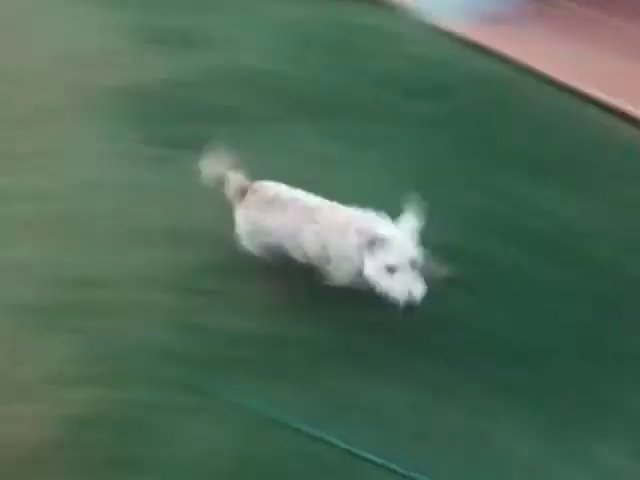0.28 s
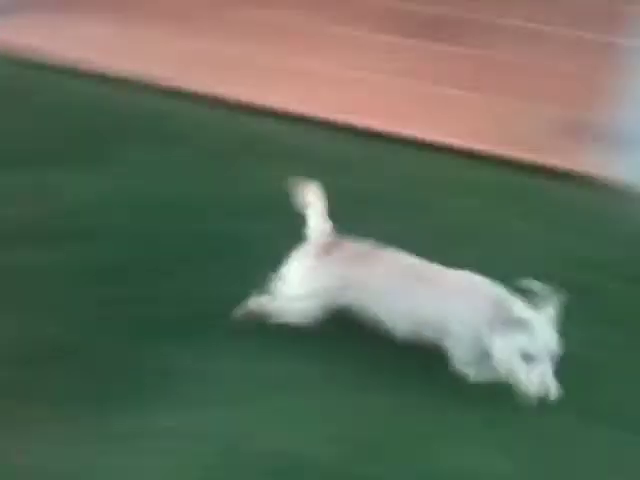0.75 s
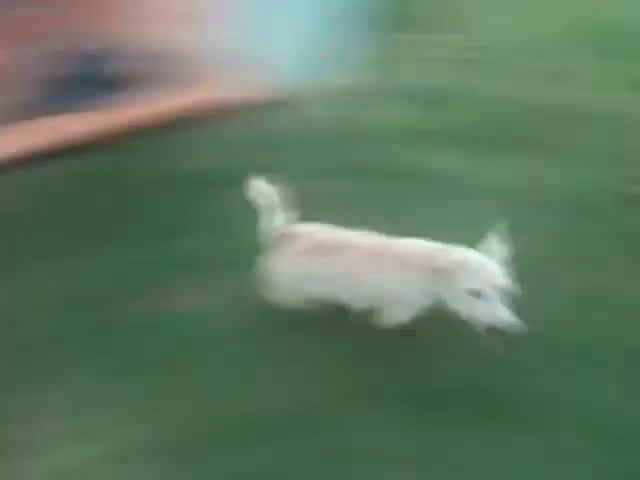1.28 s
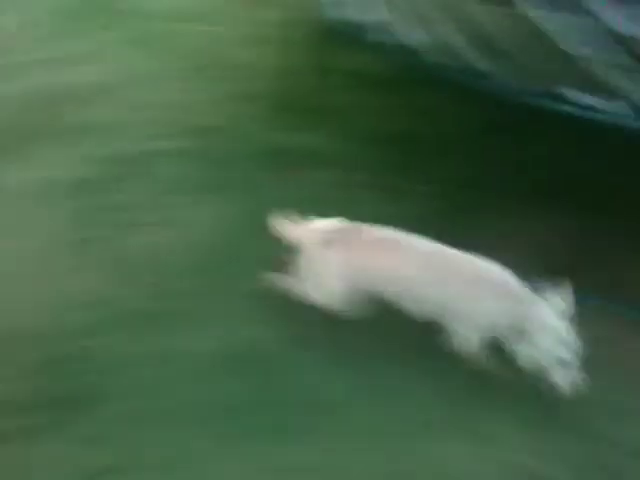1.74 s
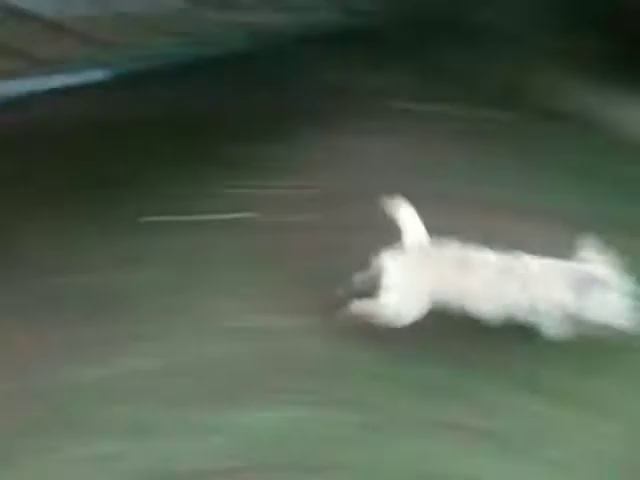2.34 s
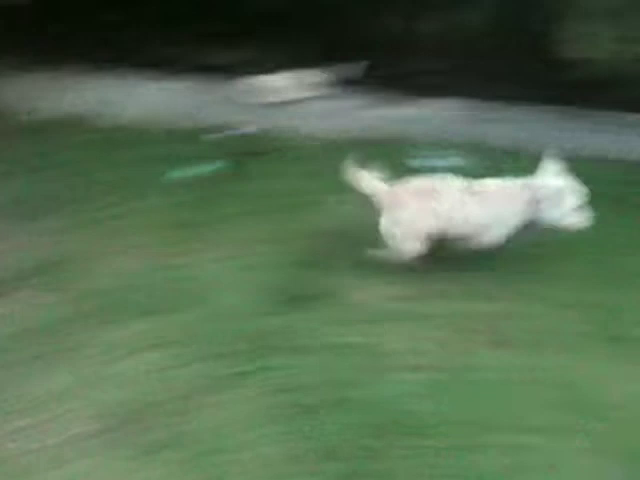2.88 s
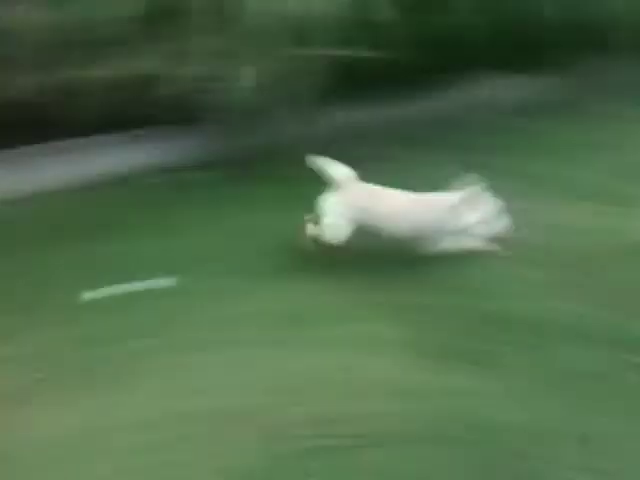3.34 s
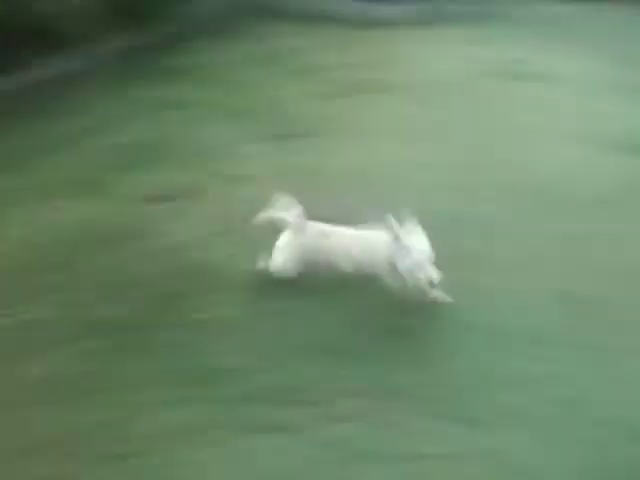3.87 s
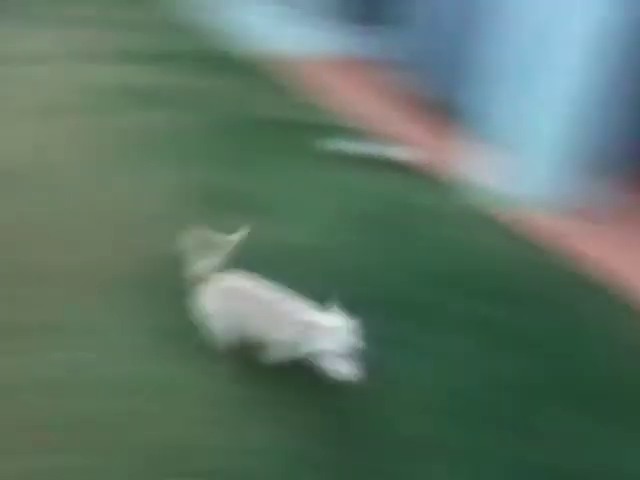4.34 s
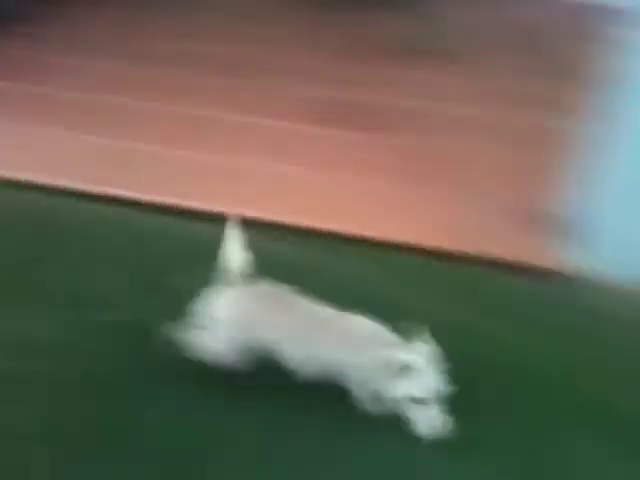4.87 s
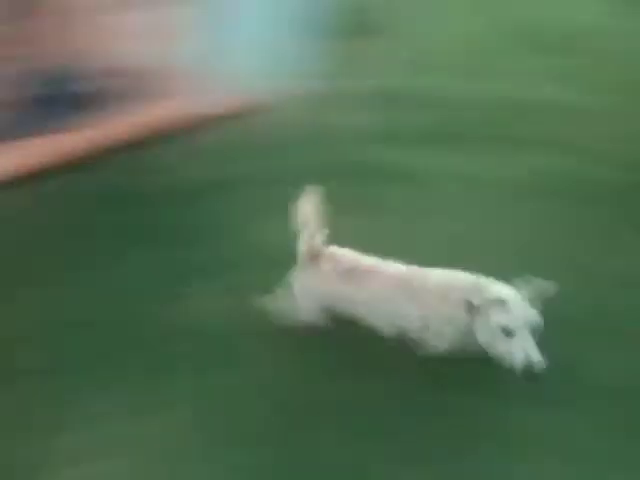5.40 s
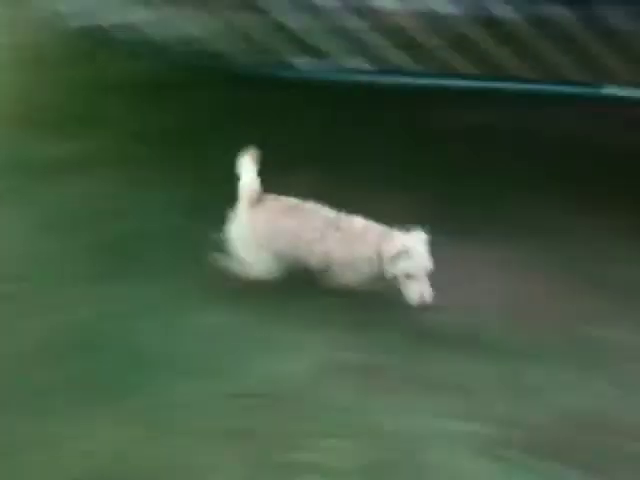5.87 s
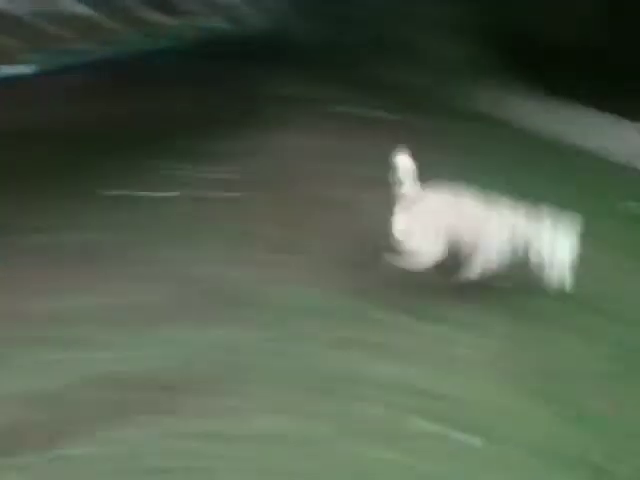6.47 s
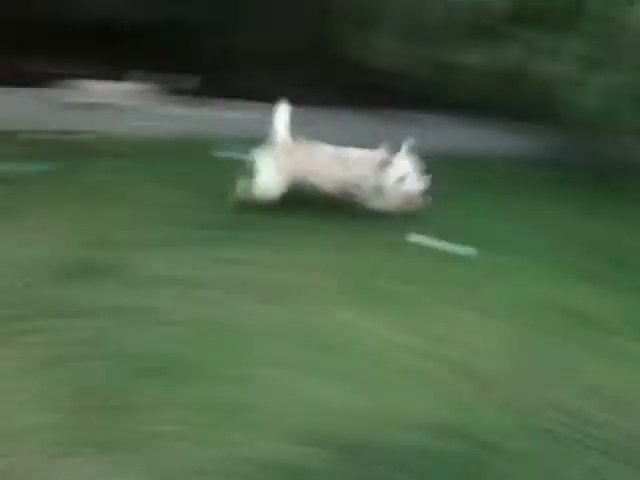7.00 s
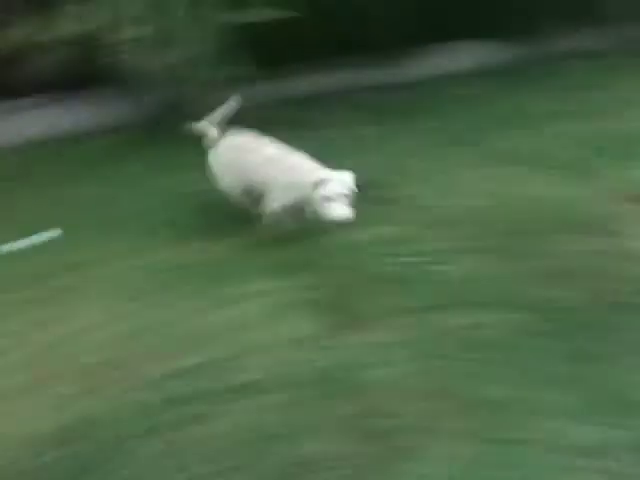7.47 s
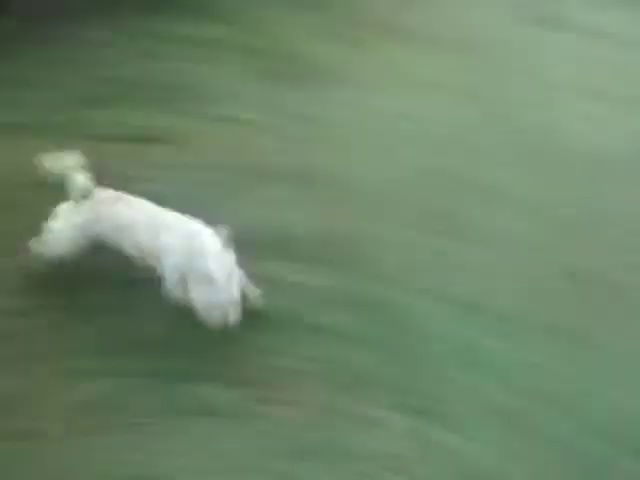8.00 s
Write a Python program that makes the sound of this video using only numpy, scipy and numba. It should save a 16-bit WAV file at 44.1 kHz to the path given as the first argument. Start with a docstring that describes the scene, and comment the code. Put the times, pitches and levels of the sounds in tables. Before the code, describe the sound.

A small dog gallops around a lawn, panting in quick short huffs with tags clinking and grass swishing, while wind gusts rumble and thump the microphone.

```python
"""Small dog galloping on a lawn

A small dog gallops round, panting once a stride: breath noise through throat, nose and mouth resonances.
The metal tags on its collar clink as struck, ringing modes; its paws swish through the grass in short
puffs of noise. Gusts buffet the microphone with rumble, turbulence and single thumps, over a steady
outdoor hiss of coloured noise. Dull echoes follow the dog."""
import sys
import numpy as np
from scipy import signal
from scipy.io import wavfile
from numba import njit

SR = 44100
rng = np.random.default_rng(int(sys.argv[2]) if len(sys.argv) > 2 else 0)


def dump_mix(stems):
    """Bounce the given channels to the path in sys.argv[1] as a 16-bit WAV at rate SR."""
    frames = np.atleast_2d(stems).T  # one column per channel
    limited = np.clip(frames, -1, 1)  # hard clip at full scale
    pcm = np.round(limited * 32767).astype(np.int16)
    wavfile.write(sys.argv[1], SR, pcm)


N = 363316
TIME = np.arange(N) / SR

# outdoor air spectrum: pitch_hz [Hz], level_db [dB per Hz, relative]
AIR_SPECTRUM = [(15, -50), (25, -36), (64, 6.5), (129, -4.5), (174, 2.5), (291, -30.5), (370, -3),
                (727, -3.5), (1000, -3), (2800, -6.5), (3290, -5.5), (6990, -5.5), (15700, -17.5)]
AIR_DB = -64.5

# gust envelope, before thinning and the port: start_s [s], rumble_db [dB], turbulence_db [dB]
GUSTS = [(0.0, -46.5, -83), (0.15, -69, -89), (0.34, -64.5, -77), (0.46, -93, -79), (0.66, -62, -85),
         (0.72, -52, -72), (0.75, -66, -72), (0.79, -56, -72), (0.85, -63, -82), (1.0, -58.5, -97),
         (1.12, -68, -99), (1.26, -46, -54), (1.35, -60.5, -94), (1.7, -63.5, -68), (1.82, -84, -75),
         (2.5, -73.5, -75.5), (2.62, -45, -68), (2.68, -48.5, -73), (2.75, -39, -61), (2.9, -46, -60),
         (3.17, -52.5, -100), (3.67, -50.5, -80), (3.8, -39.5, -39), (4.11, -40.5, -49.5),
         (4.22, -39.5, -32), (4.36, -41, -51), (4.46, -43, -59), (4.58, -54, -81), (4.9, -52.5, -65),
         (5.2, -63, -110), (5.3, -42.5, -55), (5.38, -51, -59), (5.46, -69.5, -71.5), (6.4, -68.5, -78),
         (6.54, -83, -77.5), (7.0, -69.5, -78.5), (7.16, -41.5, -60.5), (7.5, -38, -46.5),
         (7.7, -37.5, -44.5), (7.82, -39.5, -48.5), (7.92, -37, -38), (8.0, -38.5, -51),
         (8.24, -41.5, -50.5)]
# eddies hitting the port: start_s [s], peak_db [dB], pitch_hz [Hz], snap_db [dB]
BUFFETS = [(0.032, -31.5, 171, -69), (0.154, -47, 186, -67), (0.182, -36, 167, -70),
           (0.249, -39.5, 165, -64), (0.058, -37, 170, -62), (0.511, -43.5, 135, -61),
           (0.675, -35, 141, -67), (0.728, -29, 167, -46), (0.77, -34, 140, -45), (0.883, -35, 230, -66),
           (1.184, -39, 161, -61), (1.229, -32.5, 176, -50), (1.388, -40.5, 156, -71),
           (1.429, -42.5, 182, -66), (1.511, -41, 164, -66), (1.612, -44, 137, -66), (1.687, -46, 186, -64),
           (1.744, -38.5, 165, -47), (1.897, -39, 199, -60), (2.122, -46.5, 207, -63),
           (2.411, -40, 181, -72), (2.574, -36, 135, -64), (2.71, -26.5, 159, -61),
           (2.754, -28.5, 218, -54), (2.787, -27, 196, -56), (2.891, -48, 136, -60),
           (3.187, -39.5, 212, -64), (3.0, -36, 160, -62), (3.04, -41, 170, -62), (3.31, -34, 170, -60),
           (3.267, -29, 164, -61), (3.441, -25.5, 178, -58), (3.495, -32, 170, -58),
           (3.516, -22.5, 169, -30), (3.585, -33, 159, -62), (3.718, -39.5, 184, -46),
           (3.769, -26, 143, -37), (3.798, -28, 274, -25), (3.888, -31, 257, -36), (4.135, -28, 294, -23),
           (4.182, -29, 274, -15), (4.199, -22, 198, -19), (4.241, -24, 202, -21.5),
           (4.372, -25.5, 244, -44), (4.435, -35, 144, -38), (4.53, -27.5, 194, -66),
           (4.579, -33.5, 135, -61), (4.663, -27.5, 182, -53), (4.799, -32.5, 134, -54),
           (4.897, -28.5, 160, -58), (4.95, -25.5, 205, -40), (5.004, -39, 154, -59),
           (5.057, -33, 145, -67), (5.116, -32, 128, -67), (5.284, -35, 202, -50), (5.316, -33.5, 232, -44),
           (5.879, -44.5, 181, -53), (6.05, -45.5, 158, -61), (6.23, -42, 178, -59), (6.42, -45, 174, -67),
           (7.014, -49, 151, -60), (7.127, -31, 188, -52), (7.154, -40, 180, -57), (7.193, -26.5, 204, -60),
           (7.267, -36, 161, -54), (7.357, -24, 250, -51), (7.43, -41, 155, -37), (7.463, -22.5, 186, -32),
           (7.514, -33, 185, -41), (7.609, -22.5, 198, -51), (7.639, -26, 195, -39), (7.73, -22, 198, -47),
           (7.764, -22, 186, -33), (7.782, -24, 231, -28), (7.857, -21, 171, -36), (7.92, -21, 188, -36),
           (8.186, -21, 181, -50)]
# deep gust noise: pitch_hz [Hz], level_db [dB per Hz, relative]
RUMBLE_SPECTRUM = [(15, -69), (25, 8), (54, -16), (104, 4.5), (135, 4), (184, 7.5), (253, -3.5),
                   (358, -20.5), (568, -58), (700, -64), (910, -56), (1540, -120)]
# brighter gust noise: pitch_hz [Hz], level_db [dB per Hz, relative]
TURBULENCE_SPECTRUM = [(150, 3), (300, 18.5), (450, 11.5), (700, -9), (1100, -44), (2000, -19), (4000, -85)]
# as the rumble envelope climbs from calm to strong, the share of its deepest part shed grows from 0 to this
CALM_DB, STRONG_DB, THINNING = -52.5, -30, 0.74
# each eddy trails a swell of gust noise: level under its peak, time to its height
WAKE_DB, WAKE_S, WAKE_TURBULENCE_DB = -22, 0.016, -28.5

# paws in grass: start_s [s], level_db [dB], body_db [dB over the top band]
SWISHES = [(0.0176, -46, -32), (0.049, -51.5, -2), (0.2344, -50.5, -1.5), (0.5544, -60, 11),
           (0.7751, -63, -5), (1.06, -54.5, -1), (1.3992, -51, -9), (1.4644, -64, -1), (2.0507, -56, -25),
           (2.156, -65, 11), (2.6565, -50, -27), (2.7821, -55, -7), (2.9416, -52.5, -22),
           (3.0957, -47, -12), (3.2394, -51, -17), (3.3139, -64, -3), (3.4, -51, -16), (3.6895, -55, -8),
           (4.872, -63.5, 14.5), (4.9222, -57.5, 5.5), (5.5428, -59, -6), (5.757, -63, 5), (6.303, -56, -5),
           (6.5994, -58, -3), (6.7516, -54, -16), (6.8886, -52, -16), (6.965, -56, -10), (7.287, -54, -9),
           (7.3662, -57, -1), (7.7483, -55, -2)]
# the snap of the blades, then their quieter settling
SWISH_RISE_S, SWISH_T60_S, SETTLE_DB, SETTLE_T60_S = 0.0019, 0.025, -20, 0.15

# tags touching: start_s [s], low_pair_db [dB], middle_pair_db [dB], overtone_db [dB], top_pair_db [dB]
CLINKS = [(0.1226, -53, -65, -79, -68), (0.1494, -52, -62, -61, -63), (0.1694, -50, -64, -55, -69),
          (0.2104, -50, -69, -68, -65), (0.618, -47.5, -60, -80, -63), (0.6519, -60, -77, -82, -76),
          (0.7841, -54, -70, -78, -63), (1.0595, -49.5, -61, -67, -75), (2.3825, -44.5, -57, -59, -58),
          (2.3994, -49, -53.5, -74, -61), (2.4294, -49, -62, -76, -58), (2.6694, -56, -66, -58, -60),
          (2.7194, -60, -78, -76, -76), (2.7846, -59, -76, -66, -67), (3.1577, -48, -61, -66, -58),
          (3.5897, -51.5, -57.5, -75, -63), (4.6109, -37, -44.5, -55, -54), (4.6324, -65, -57, -64, -61),
          (4.6568, -56, -63, -71, -66), (4.6773, -38, -47.5, -69, -55), (4.7127, -49, -54, -77, -63),
          (5.012, -66, -64, -73, -59), (6.103, -50, -63, -64, -57), (7.1033, -44.5, -49, -61, -58),
          (7.4754, -37.5, -45, -80, -54)]
# ringing modes of the tags, one group per level column of CLINKS:
# pitch_hz [Hz], level_db [dB over that column], t60_s [s]
TAG_MODES = [
    [(7065, -11, .1), (7115, -8, .16), (7200, -15, .14)],
    [(8077, -4, .24), (8126, -3, .24)],
    [(10310, -6, .07), (12790, -2, .08)],
    [(14766, -3, .09), (14890, -8, .06), (15010, -3, .08)],
]

# pants: start_s [s], length_s [s], onset_db [dB], end_db [dB], throat_onset_hz [Hz], throat_end_hz [Hz],
# lower_mouth_hz [Hz, mid-pant], then mid-pant levels over the breath:
# throat_db [dB], upper_mouth_db [dB], nose_db [dB], hiss_db [dB]
PANTS = [(0.214, 0.053, -72.5, -67.5, 1770, 1590, 3350, 8.5, -4, -1, -6),
         (0.524, 0.078, -63.5, -68.5, 1680, 1680, 3250, 8.5, 0, -2, -6),
         (0.868, 0.041, -49, -50.5, 1700, 1690, 3450, -6, -5, -9, -6),
         (0.923, 0.044, -58.5, -67, 1750, 1840, 3360, 4.5, -1, 0, -6),
         (1.237, 0.094, -51, -70, 935, 1620, 2840, 7, -3, 1.5, 4),
         (1.412, 0.031, -75.5, -81, 1340, 1340, 2960, 3, 11, 9, 16.5),
         (1.545, .07, -72, -73.5, 1750, 1650, 3050, 7, -10, -5, -14),
         (1.708, 0.023, -73, -71, 1350, 1470, 2900, 0, 5.5, 2.5, 3),
         (1.859, 0.039, -61.5, -55.5, 1750, 1800, 3450, 2, -2, -23, -7),
         (1.903, 0.024, -54, -59.5, 1780, 1860, 2980, 1.5, 3, -5, 1.5),
         (2.132, 0.014, -60.5, -74, 1270, 1250, 2760, 12, 3.5, 0, -19),
         (2.195, 0.053, -59, -65, 1620, 1690, 2560, -7, 4.5, -6, -1),
         (2.459, 0.032, -75, -69, 1760, 1790, 3130, -2, 2, 1, 9.5),
         (2.493, 0.034, -63, -64.5, 1820, 1800, 3100, 9.5, 2, -19, 3),
         (3.125, 0.049, -55.5, -69.5, 1710, 1700, 2500, 8, -7, -27, 0),
         (3.42, 0.042, -71.5, -71.5, 1800, 1710, 2380, 3, 1, -16, 5),
         (3.711, 0.075, -58, -56, 1800, 1210, 2800, 0, -4, -28, -10),
         (3.96, .03, -71, -61, 1360, 1330, 2820, 6, -11, -13, -17),
         (3.996, 0.049, -49, -57.5, 1290, 1100, 2950, 1, -6, -6.5, -18),
         (4.052, .045, -61, -69.5, 1530, 1110, 2750, 1, 8.5, -13.5, -8),
         (4.307, 0.061, -57, -69, 1510, 1610, 2830, -2, 5.5, 1.5, -4),
         (4.591, 0.11, -56, -69.5, 1660, 1310, 3120, 1.5, 4, -1.5, -8),
         (4.935, 0.062, -66.5, -60.5, 1250, 1640, 2950, -1, -0.5, 2.5, -3.5),
         (5.251, 0.023, -56.5, -68, 1570, 1410, 2700, 4.5, -9, -2.5, -13),
         (5.29, 0.032, -42, -57.5, 940, 905, 2220, 4.5, -34, -9, -16),
         (5.345, 0.067, -59, -73.5, 960, 1160, 2830, 6.5, 4.5, 2, 0),
         (5.572, 0.069, -61.5, -69.5, 1290, 1310, 2600, -2.5, -1.5, -3, 0),
         (5.761, .035, -69.5, -71.5, 1200, 1190, 2850, -1, 1, 6.5, -6),
         (5.867, 0.038, -59.5, -62.5, 1840, 1760, 3330, 8, 8, -4, 1),
         (6.187, 0.083, -64, -69.5, 1440, 1340, 3150, -2, 2, 3, -1),
         (6.499, 0.048, -65, -72, 1550, 1260, 3100, 2.5, 6.5, -2, 2),
         (6.780, 0.047, -56, -68.5, 1610, 1690, 3080, 1, -5, -8, 3.5),
         (7.07, 0.073, -60.5, -72.5, 1900, 1500, 3250, -0.5, 0, -7, 5),
         (7.421, .055, -63.5, -75, 1460, 1100, 2530, -7, 3.5, -8, 1),
         (7.732, 0.086, -61.5, -71.5, 1750, 1400, 3350, 2, 7.5, -1, -12),
         (8.101, 0.091, -60, -72, 1610, 1290, 3120, -11, -1, -8, -4)]
# steady nasal resonances: pitch_hz [Hz], width_hz [Hz], level_db [dB]
NOSE_RESONANCES = [(794, 60, -14), (1143, 51, -10), (2180, 570, -11.5)]
# level change of each part against the breath, from onset to end
THROAT_SWELL_DB, UPPER_SWELL_DB, NOSE_SWELL_DB, HISS_SWELL_DB = 0.5, 1.5, 6.5, 1
PANT_RISE_DB_PER_S, PANT_FALL_DB_PER_S = 1500, 414   # before the onset, after the end
LOWER_MOUTH_WIDTH_HZ, UPPER_MOUTH_WIDTH_HZ, UPPER_MOUTH_HZ = 330, 650, 4750
MOUTH_SAG_HZ_PER_S = 2200   # the lower mouth resonance sinks through a pant

TOP_STOP_HZ = 16050   # 60 dB down from here upward


def amp(db):
    """Turn dB into gain."""
    return 10 ** (np.asarray(db) / 20)


def rms_one(x):
    """Scale to rms 1."""
    return x / np.sqrt(np.mean(x ** 2) + 1e-20)


def drift(corner_hz):
    """Slow random wavering of spread 1: noise through two one-pole low-passes, made at an eighth of SR."""
    r = np.exp(-16 * np.pi * corner_hz / SR)
    noise = rng.standard_normal(N // 8 + 4002)
    slow = signal.lfilter([1], [1, -2 * r, r * r], noise)[4000:]   # drop the run-in
    return np.interp(np.arange(N) / 8, np.arange(len(slow)), rms_one(slow))


def band(x, low_hz, high_hz):
    """Band-pass, kept below the Nyquist limit."""
    edges = [low_hz, min(high_hz, .49 * SR)]
    return signal.sosfilt(signal.butter(2, edges, "band", fs=SR, output="sos"), x)


def coloured(spectrum, patchy_db, flicker_hz):
    """Noise in half-octave bands, each with its own level and flicker; rms 1."""
    hz, level_db = np.transpose(spectrum)
    edges = 22 * 2 ** np.arange(0, 10, .5)
    white = rng.standard_normal((2, N))   # neighbouring bands take different noise
    out = 0
    for k, (low, high) in enumerate(zip(edges, edges[1:])):
        band_db = np.interp(np.log(low * high) / 2, np.log(hz), level_db, right=-90)
        if band_db > -90:
            out = out + amp(band_db + patchy_db * drift(flicker_hz)) * band(white[k % 2], low, high)
    return rms_one(out)


def ring(clicks, hz, t60_s):
    """A decaying mode: each unit click sets off a sine of height 1."""
    r = amp(-60 / (t60_s * SR))
    w = 2 * np.pi * hz / SR
    return signal.lfilter([0, np.sin(w)], [1, -2 * r * np.cos(w), r * r], clicks + 1e-18)


@njit
def moving_resonance(x, cosine, r):
    """Two-pole resonance whose centre moves from sample to sample."""
    out = np.zeros(len(x))
    for i in range(2, len(x)):
        out[i] = x[i] - x[i - 2] + 2 * r * cosine[i] * out[i - 1] - r * r * out[i - 2]
    return out


def formant(air, hz, width_hz):
    """Noise through a resonance that follows a pitch curve and trembles about it; rms 1."""
    hz = hz * (1 + 0.052 * drift(24))
    return rms_one(moving_resonance(air, np.cos(2 * np.pi * hz / SR), np.exp(-np.pi * width_hz / SR)))


def outdoor_air():
    """Steady outdoor hiss: coloured noise whose bands flicker slightly."""
    return amp(AIR_DB) * coloured(AIR_SPECTRUM, patchy_db=2.14, flicker_hz=20.0)


def buffet(since, peak_db, hz, snap_db, cycles=4.1, sharp=1.85, snap_hz=520, snap_t60_s=0.0093):
    """An eddy's push rises within a cycle and rings out, 30 dB down after `cycles`; its crest snaps."""
    rise = np.tanh(hz * since * sharp)
    push = amp(peak_db - 30 * hz * since / cycles) * np.cos(2 * np.pi * hz * since)
    late = np.maximum(since - 0.967 / hz, 0)   # the snap waits nearly one cycle
    snap = amp(snap_db - 60 * late / snap_t60_s) * np.sin(2 * np.pi * snap_hz * late)
    return rise * push + snap * np.tanh(1.6 * snap_hz * late)


def wind(lumpy_db=4.0, port_hz=110):
    """Eddies shed at the microphone port: lumpy rumble, thinner deep down in strong gusts, and thumps."""
    s, rumble_db, turbulence_db = np.transpose(GUSTS)
    rumble_db = np.interp(TIME, s, rumble_db)
    turbulence_db = np.interp(TIME, s, turbulence_db)
    lumps = rms_one(amp(lumpy_db * np.tanh(drift(29.3))))
    rumble = coloured(RUMBLE_SPECTRUM, patchy_db=3.0, flicker_hz=10.9)
    strong = np.clip((rumble_db - CALM_DB) / (STRONG_DB - CALM_DB), 0, 1)
    rumble = rumble - THINNING * strong * band(rumble, 39, 173)
    turbulence = coloured(TURBULENCE_SPECTRUM, patchy_db=4.0, flicker_hz=27.4)
    out = lumps * (amp(rumble_db) * rumble + amp(turbulence_db) * turbulence)
    stirred = lumps * (rumble + amp(WAKE_TURBULENCE_DB) * turbulence)
    for start_s, peak_db, hz, snap_db in BUFFETS:
        i = int(start_s * SR)
        since = TIME[:min(N - i, SR // 5)]
        span = slice(i, i + len(since))
        swell = since / WAKE_S * np.exp(1 - since / WAKE_S)
        wake = amp(peak_db + WAKE_DB) * swell * stirred[span]
        out[span] += buffet(since, peak_db, hz, snap_db) + wake
    # the vented capsule passes little below its corner
    return signal.sosfilt(signal.butter(3, port_hz, "high", fs=SR, output="sos"), out)


def grass(rustle_per_s=14, rustle_db=-82, spread_db=4.5, rustle_t60_s=.04):
    """Blades snap back under the paws: short dying puffs, with faint rustles scattered throughout."""
    noise = rng.standard_normal((2, N))
    top = rms_one(band(noise[0], 5600, 24000))
    body = rms_one(band(noise[1], 1570, 6600))
    out = np.zeros(N)
    for s, level_db, body_db in SWISHES:
        i = int(s * SR)
        span = slice(i, min(N, i + SR // 10))
        since = TIME[span] - s
        snap = amp(level_db - 60 * since / SWISH_T60_S) * np.tanh(since / SWISH_RISE_S)
        settle = amp(level_db + SETTLE_DB - 60 * since / SETTLE_T60_S)
        out[span] += (snap + settle) * (top[span] + amp(body_db) * body[span])
    tick_db = rustle_db + spread_db * np.minimum(rng.exponential(1, N), 3)
    ticks = (rng.random(N) < rustle_per_s / SR) * amp(tick_db)
    rustle = signal.lfilter([1], [1, -amp(-60 / (rustle_t60_s * SR))], ticks)
    return out + rustle * (top + 0.49 * body)


def tags(chatter_db=-9, chatter_s=.05, swing_db=3.5):
    """Each touch strikes the modes of two thin discs; they chatter briefly and waver as they swing."""
    rows = np.array(CLINKS)
    out = np.zeros(N)
    after_s = chatter_s * rng.random((len(rows), 3))   # three small touches after each clink
    first = (rows[:, 0] * SR).astype(int)
    later = ((rows[:, :1] + after_s) * SR).astype(int)
    for column, modes in enumerate(TAG_MODES, start=1):
        for hz, level_db, t60_s in modes:
            blow = amp(rows[:, column] + level_db)
            clicks = np.zeros(N)
            clicks[first] = blow
            clicks[later] += blow[:, None] * amp(chatter_db) * rng.standard_normal(after_s.shape)
            mode = band(ring(clicks, hz, t60_s), .95 * hz, 1.05 * hz)
            out += mode * amp(swing_db * drift(60))
    return out


def pant_curves():
    """Breath level, throat and lower mouth pitch, and part levels, taken from the loudest pant at each moment."""
    columns = np.transpose(PANTS)[:, :, None]
    s, length, onset_db, end_db, onset_hz, end_hz, mouth_hz, throat_db, high_db, nose_db, hiss_db = columns
    frames = TIME[::32]
    since = frames - s
    along = np.clip(since / np.maximum(length, .005), 0, 1)   # 0 at the onset, 1 at the end
    middle = along - .5
    rise_db = PANT_RISE_DB_PER_S * np.minimum(since, 0)
    fall_db = PANT_FALL_DB_PER_S * np.maximum(since - length, 0)
    breath_db = onset_db + along * (end_db - onset_db) + rise_db - fall_db
    loudest = breath_db.argmax(axis=0)[None]
    curves = [breath_db,
              onset_hz + along * (end_hz - onset_hz),
              mouth_hz - MOUTH_SAG_HZ_PER_S * length * middle,
              throat_db + THROAT_SWELL_DB * middle,
              high_db + UPPER_SWELL_DB * middle,
              nose_db + NOSE_SWELL_DB * middle,
              hiss_db + HISS_SWELL_DB * middle]
    return [np.interp(TIME, frames, np.take_along_axis(c, loudest, axis=0)[0]) for c in curves]


def panting(throat_width_hz=170, broad_db=-9, rough_db=1.5, patchy_db=2.5):
    """Air rushing through throat, nose and open mouth; the flow flutters and the resonant parts waver."""
    breath_db, throat_hz, low_hz, throat_db, high_db, nose_db, hiss_db = pant_curves()
    air = rng.standard_normal((4, N))
    throat = formant(air[0], throat_hz, throat_width_hz)
    nose = 0
    for hz, width_hz, db in NOSE_RESONANCES:
        nose = nose + amp(db + patchy_db * drift(17)) * formant(air[1], hz + 0 * TIME, width_hz)
    # each mouth resonance sits on some broad breath noise
    low = formant(air[2], low_hz, LOWER_MOUTH_WIDTH_HZ)
    low = low + amp(broad_db) * rms_one(band(air[0], 2100, 4370))
    high = formant(air[1], UPPER_MOUTH_HZ + 0 * TIME, UPPER_MOUTH_WIDTH_HZ)
    high = high + amp(broad_db) * rms_one(band(air[0], 3500, 5100))
    voice = amp(hiss_db) * rms_one(band(air[3], 2670, 9060))
    parts = [(throat_db, band(throat, 770, 3850)), (nose_db, nose),
             (0, band(low, 1600, 5250)), (high_db, band(high, 4780, 15000))]
    for db, part in parts:
        voice = voice + amp(db + patchy_db * drift(25.0)) * rms_one(part)
    flutter_db = rough_db * rms_one(band(air[3], 40, 163))
    return amp(breath_db + flutter_db) * voice


def scene():
    """Dog close by, with dull echoes from wall and fence; wind and air around."""
    dog = panting() + tags() + grass()
    dull = band(dog, 430, 4300)
    for lag_s, echo_db in [(.021, -19), (.047, -23.5), (.083, -35.5)]:
        lag = int(lag_s * SR)
        dog[lag:] += amp(echo_db) * dull[:-lag]
    return (outdoor_air() + wind() + dog)[None]


def record(dry):
    """Cut the extreme top with a steep low-pass."""
    return signal.sosfilt(signal.cheby2(16, 60, TOP_STOP_HZ, fs=SR, output="sos"), dry)


dry = scene()
out = record(dry)
dump_mix(out)
```